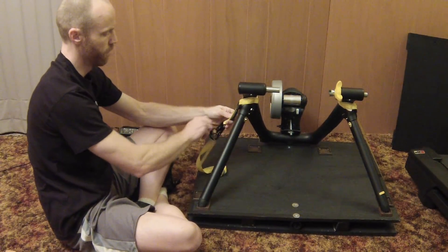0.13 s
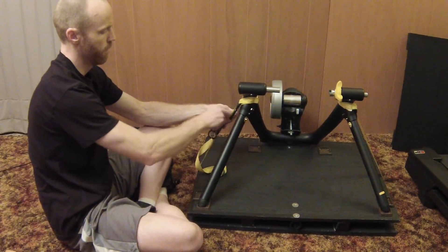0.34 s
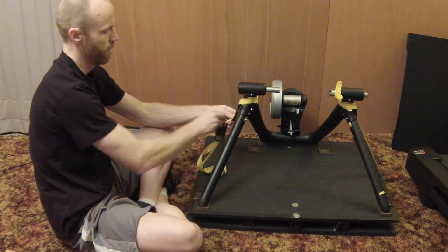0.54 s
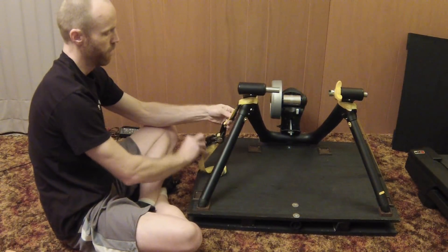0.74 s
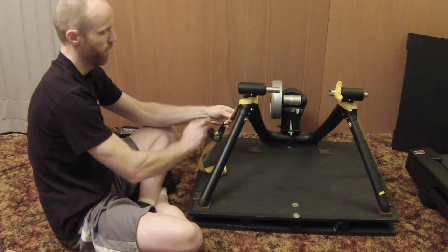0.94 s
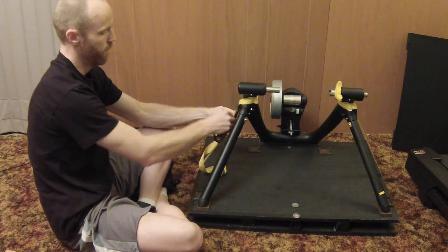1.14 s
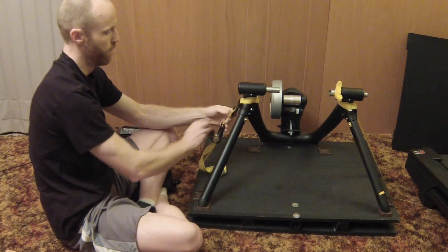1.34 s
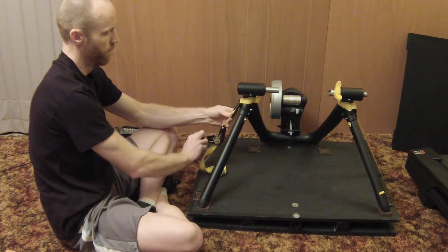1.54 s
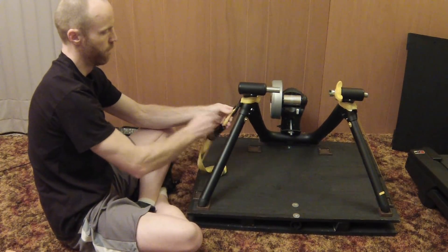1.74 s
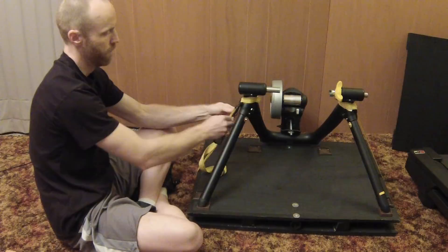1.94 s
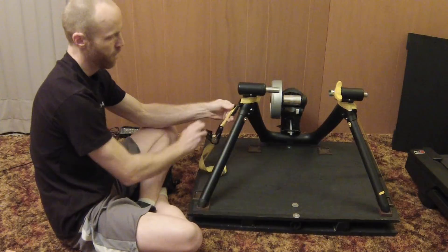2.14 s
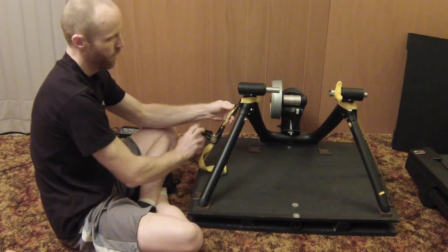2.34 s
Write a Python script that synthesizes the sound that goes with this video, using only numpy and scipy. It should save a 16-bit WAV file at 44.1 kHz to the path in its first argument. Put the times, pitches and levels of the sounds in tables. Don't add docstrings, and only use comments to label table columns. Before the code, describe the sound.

A metal ratchet buckle clicks in quick irregular bursts, with faint squeaks and dull frame knocks.

```python
import sys
import numpy as np
from scipy import signal
from scipy.fft import rfft, irfft, next_fast_len
from scipy.io import wavfile
from scipy.ndimage import uniform_filter1d

SR = 44100
rng = np.random.default_rng(int(sys.argv[2]) if len(sys.argv) > 2 else 0)


def transcribe(signal):
    frames = np.atleast_2d(signal).T
    limited = np.clip(frames, -1, 1)
    pcm = np.round(limited * 32767).astype(np.int16)
    wavfile.write(sys.argv[1], SR, pcm)


def convert_level_to_amplitude(level_db):
    exponent = np.asarray(level_db, float) / 20
    return 10 ** exponent


N = 109368


def pawl_snaps():
    # start in seconds, level in dB, brightness in dB per octave, ring in Hz, ring level in dB.
    snaps = [(.342, -29.5, 0.5, 5776, -11.5), (.449, -25.5, 0.5, 6540, -16.5),
             (.716, -29.5, -2.5, 6450, -12), (0.759, -27.5, 0, 5200, -18), (0.862, -30, 0, 7550, -18.5),
             (1.07, -26.5, 0, 6780, -8.5), (1.1279, -23, 4.5, 5800, -13), (1.187, -26.5, 0, 6830, -14.5),
             (1.437, -26, -1, 5600, -15), (1.483, -28.5, -1.5, 10260, -23), (1.883, -24.5, 3, 6370, -19.5),
             (1.953, -33, -5.5, 6900, -27), (2.197, -26.5, -2.5, 7030, -20), (2.326, -38, -4.5, 6800, -8.5)]
    contact_s, ring_t60 = .0013, .022
    out, t = np.zeros(N), np.arange(SR // 8) / SR
    blow = 1. * (t == 0)
    for s, db, slope, hz, ring_db in snaps:
        crack = colour(blow, tilted(slope, 6000))
        tooth = steel(split([(hz, ring_db, ring_t60)]) + parts(), t)
        add(out, s, convert_level_to_amplitude(db) * (crack + tooth), contact_s)
    return highpass(out, 3, 900)


def swing_ticks():
    # start in seconds, level in dB, brightness in dB per octave, length in seconds.
    ticks = [(.001, -62, -14.5, 0.004), (0.051, -66.5, -3.5, 0.0039), (0.086, -66.5, -7, .002),
             (.260, -59, -3, 0.00084), (.290, -44.5, -2.5, .001), (0.332, -53, 2, 0.0011),
             (0.641, -55, -10, 0.0064), (0.657, -52.5, -11, 0.0085), (1.004, -43.5, -2.5, 0.006),
             (1.048, -57, -11, 0.0042), (1.339, -56, -9, 0.00067), (1.363, -53.5, -5.5, 0.0022),
             (1.41, -59, -20, 0.0056), (1.750, -48, 1.5, 0.004), (1.762, -42, -1.5, 0.0041),
             (1.779, -44.5, -3.5, 0.0033), (1.82, -43, -15, 0.0055), (1.865, -62, -12, 0.0086),
             (2.110, -46, -1, 0.004), (2.335, -32.5, -3, 0.0027), (0.709, -42.5, 2, 0.0022),
             (0.44, -43, -9, .003), (1.433, -35, 9, .002), (0.857, -37.5, 3.5, .002), (2.189, -50, 7, .002),
             (2.474, -51, -15.5, 0.0025)]
    out, t = np.zeros(N), np.arange(SR // 8) / SR
    blow = 1. * (t == 0)
    for s, db, slope, length in ticks:
        crack = colour(blow, tilted(slope, 6000))
        add(out, s, convert_level_to_amplitude(db) * (crack + steel(parts(), t)), length)
    return highpass(out, 3, 900)


def handle_clanks():
    # start in seconds, level in dB.
    clanks = [
        (2.199, -28.5),
        (2.329, -39),
    ]
    # pitch in Hz, level in dB, t60 in seconds.
    handle_modes = [(2800, -5, .025), (4450, -2, .05), (4950, -3, .07), (5150, -1, .08), (5300, -4, .08),
                    (6740, -3, .03), (7900, -9, .02), (10150, -4, .06)]
    bloom_s = 0.0094
    out, t = np.zeros(N), np.arange(SR // 8) / SR
    for s, db in clanks:
        clank = steel(split(handle_modes), t) * (1 - np.exp(-t / bloom_s))
        add(out, s, convert_level_to_amplitude(db) * clank, .003)
    return highpass(out, 3, 900)


def pivot():
    # start in seconds, length in seconds, pitch in Hz, level in dB, overtone ratio, overtone in dB.
    squeaks = [
        (.662, 0.0304, 2890, -46, 1.99, -11.5),
        (0.684, 0.026, 3143, -47, 1.6, -11.5),
        (0.712, 0.041, 2955, -45.5, 2.64, -6),
        (2.145, 0.027, 3250, -55, 1.46, -4),
    ]
    rough, glide = .018, .06
    out = np.zeros(N)
    for s, length, hz, db, ratio, over_db in squeaks:
        u = np.linspace(0, 1, round(length * SR))
        drift = unit(uniform_filter1d(rng.standard_normal(len(u)), size=120))
        pitch = hz * (1 + glide * (u - .5) + rough * drift)
        phase = 2 * np.pi * np.cumsum(pitch) / SR
        flutter = 1 + .4 * unit(uniform_filter1d(rng.standard_normal(len(u)), size=150))
        tone = np.sin(phase) + convert_level_to_amplitude(over_db) * np.sin(ratio * phase)
        swell = np.sin(np.pi * u)
        add(out, s, convert_level_to_amplitude(db) * swell * flutter * tone / np.sqrt(len(u) / 4), .001)
    return out


def frame_knocks():
    # start in seconds, level in dB, brightness in dB per octave, push length in seconds.
    knocks = [(0.735, -50, -5.5, 0.013), (.765, -60, 5, 0.036), (0.864, -60.5, 7.5, 0.0033),
              (1.012, -63, -1, 0.0036), (1.075, -73.5, -17, 0.0074), (1.129, -51, 3.5, 0.0067),
              (1.195, -61, 0, 0.0036), (1.366, -64, 0, 0.0048), (1.439, -43, 3.5, 0.0055),
              (1.483, -45.5, -3, 0.005), (1.813, -47.5, -3, .02), (1.952, -50, 4.5, 0.0079),
              (2.118, -61, 5.5, 0.0095), (2.164, -65, 6, 0.0033), (2.197, -48, -3.5, 0.0079),
              (2.334, -48, 6, 0.0051)]
    # pitch in Hz, level in dB, t60 in seconds.
    frame_modes = [(205, -8, .06), (252, 0, .06), (300, -2, .05), (345, 0, .11), (520, 0, .07),
                   (700, -4, .1), (1185, -13, .05), (1450, -14, .05)]
    # frequency in Hz, level in dB.
    thud_colour = [(90, -36.5), (170, -10.5), (260, 3.5), (600, -6), (2500, -18), (8000, -37)]
    thud_db = 2.5
    dry_db = -4
    out, t = np.zeros(N + SR), np.arange(SR // 3) / SR
    for s, db, slope, length in knocks:
        modes = [(hz, level + slope * np.log2(hz / 400), t60) for hz, level, t60 in frame_modes]
        thud = colour(1. * (t == 0), lambda hz: along(thud_colour, hz) + slope * np.log2((hz + 150) / 400))
        body = ring(modes, t) * (1 - np.exp(-t / length))
        add(out, s, convert_level_to_amplitude(db) * (body + convert_level_to_amplitude(thud_db) * thud), length)
        out[round(s * SR):][:len(t)] += convert_level_to_amplitude(db + dry_db) * np.sqrt(0.022 * SR) * body
    return highpass(out, 4, 150)[:N]


def humming_tubes():
    # start in seconds, level in dB, pitch in Hz.
    hums = [
        (.870, -70, 940),
        (1.445, -66, 950),
        (1.490, -61, 950),
        (.40, -69, 1380),
    ]
    hum_t60 = 1.1
    out, t = np.zeros(N + SR), np.arange(SR // 3) / SR
    damping = np.clip((.27 - t) / 0.029, 0, 1)
    for s, db, hz in hums:
        out[round(s * SR):][:len(t)] += convert_level_to_amplitude(db - 60 * t / hum_t60) * np.sin(2 * np.pi * hz * t) * damping
    return highpass(out, 4, 150)[:N]


def hush():
    # frequency in Hz, level in dB per Hz.
    hush_colour = [(20, -6), (35, -2), (180, -7.5), (500, -15), (1500, -20.5), (6000, -28.5), (12000, -28),
                   (14000, -27.5)]
    m = next_fast_len(N)
    gain = convert_level_to_amplitude(along(hush_colour, np.fft.rfftfreq(m, 1 / SR)))
    noise = irfft(rfft(rng.standard_normal(m)) * gain, m)[:N]
    return convert_level_to_amplitude(-66) * unit(noise)


def steel(modes, t):
    return highpass(ring(modes, t), 4, 2200)


def parts():
    pitches = np.exp(rng.uniform(np.log(2800), np.log(13000), 10))
    return [(hz, -20, .014) for hz in pitches]


def split(modes):
    spread, side_db = 0.0091, -4
    return [(hz * (1 + spread * k), db + side_db, t60)
            for hz, db, t60 in modes for k in rng.normal(0, 1, 3)]


def ring(modes, t):
    out = np.zeros(len(t))
    for hz, db, t60 in modes:
        decay = convert_level_to_amplitude(db + rng.normal(0, 2) - 60 * t / t60)
        out += decay * np.sin(2 * np.pi * hz * t) / np.sqrt(t60 * SR / 27.6)
    return out


def tilted(slope_db, centre_hz):
    # frequency in Hz, level in dB per Hz.
    crack_colour = [(410, -71.5), (700, -35), (807, -34.5), (1300, -45.5), (2250, -19.5), (4770, -2.5),
                    (5790, 1.5), (8650, -2), (15500, -2.5)]
    points = [(150, -75.5)] + list(crack_colour)
    return lambda hz: along(points, hz) + slope_db * np.log2((hz + 50) / centre_hz)


def colour(x, gain_db):
    hz = np.fft.rfftfreq(2048, 1 / SR)
    cepstrum = irfft(np.log(convert_level_to_amplitude(gain_db(hz)) + 1e-5))
    cepstrum[1:1024] *= 2
    cepstrum[1025:] = 0
    h = irfft(np.exp(rfft(cepstrum)))[:1024]
    return signal.fftconvolve(x, h / np.linalg.norm(h))[:len(x)]


def highpass(x, order, hz):
    return signal.sosfilt(signal.butter(order, hz, "high", fs=SR, output="sos"), x)


def along(points, hz):
    f, v = np.transpose(points)
    return np.interp(np.log(hz + 1), np.log(f + 1), v)


def unit(x):
    return x / np.sqrt(np.mean(x ** 2) + 1e-20)


def burst(length_s, size):
    x = rng.standard_normal(size) * np.exp(-np.arange(size) / SR / max(length_s, 2e-4))
    return x / np.linalg.norm(x)


def add(track, s, x, smear_s):
    wet = room(x, smear_s)[:len(track) - round(s * SR)] * np.sqrt(.03 * SR)
    track[round(s * SR):][:len(wet)] += wet


def room(x, smear_s):
    # delay in seconds, level in dB.
    walls = [(0, -4.5), (.002, -2), (.004, 1), (.006, -2.5), (.008, 0.5), (0.0116, 4.5), (0.016, -12.5),
             (.021, -2.5), (.028, -7)]
    # frequency in Hz, t60 in seconds.
    tail_decay = [(200, 0.27), (1400, 0.27), (3700, .22), (9700, 0.2), (15000, 0.2)]
    tail_db, tail_rise_s = 8.5, 0.0066
    hz, t, z = signal.stft(rng.standard_normal(SR // 2), SR, nperseg=128)
    decay = convert_level_to_amplitude(-60 * t / along(tail_decay, hz)[:, None])
    tail = signal.istft(z * decay, SR, nperseg=128)[1]
    tail_t = np.arange(len(tail)) / SR
    tail = tail * (1 - np.exp(-(tail_t / (tail_rise_s + smear_s)) ** 2))
    h = convert_level_to_amplitude(tail_db) * tail / np.linalg.norm(tail)
    for delay, db in walls:
        h[round(delay * SR):][:4000] += convert_level_to_amplitude(db + rng.normal(0, 1.0)) * burst(smear_s, size=4000)
    return signal.fftconvolve(x, h / np.linalg.norm(h))


def scene():
    buckle = pawl_snaps() + swing_ticks() + handle_clanks() + pivot()
    return (buckle + frame_knocks() + humming_tubes() + hush())[None]


def band_limit(x):
    return signal.sosfilt(signal.butter(12, 16610, fs=SR, output="sos"), x)


def record(dry):
    top_hz, splash_db = 15620, -19
    m = next_fast_len(N + 4096)
    hz, z = np.fft.rfftfreq(m, 1 / SR), rfft(dry, m)
    limit_db = np.interp(hz, [top_hz - 300, top_hz, top_hz + 200], [0, -36, -90])
    low = irfft(z * convert_level_to_amplitude(limit_db), m)[..., :N]
    top = irfft(z * (hz > top_hz - 200) * (hz < top_hz + 1000), m)[..., :N]
    power = np.abs(uniform_filter1d(dry ** 2, size=256)) + 1e-9
    jump = power > 30 * np.roll(power, 400, axis=-1)
    opening = uniform_filter1d(1. * jump, size=128)
    return band_limit(low + convert_level_to_amplitude(splash_db) * top * opening)


dry = scene()
out = record(dry)
transcribe(out)
```